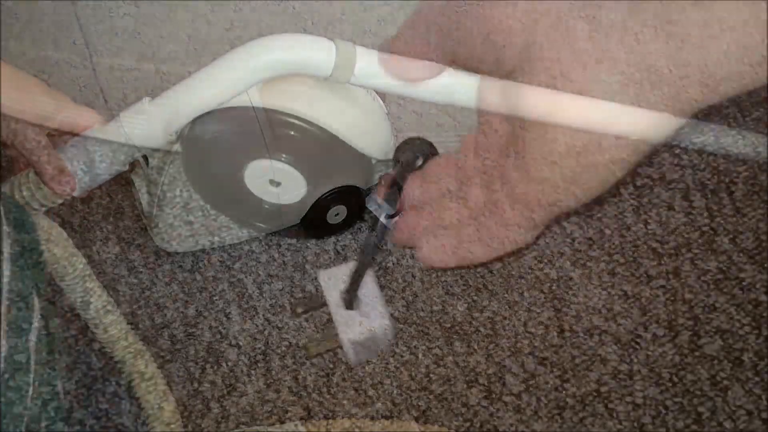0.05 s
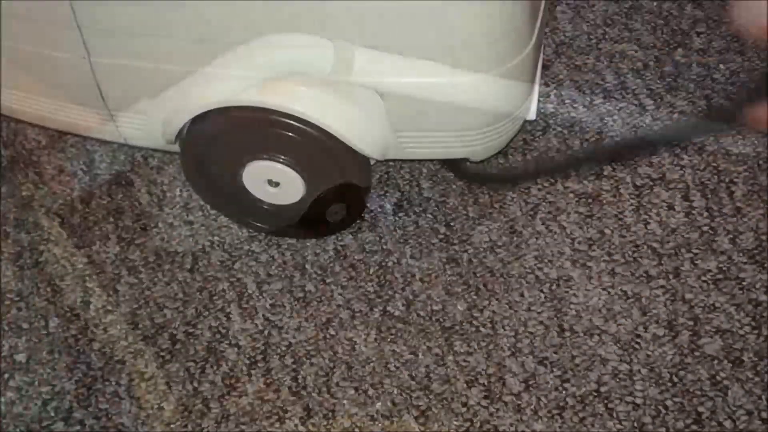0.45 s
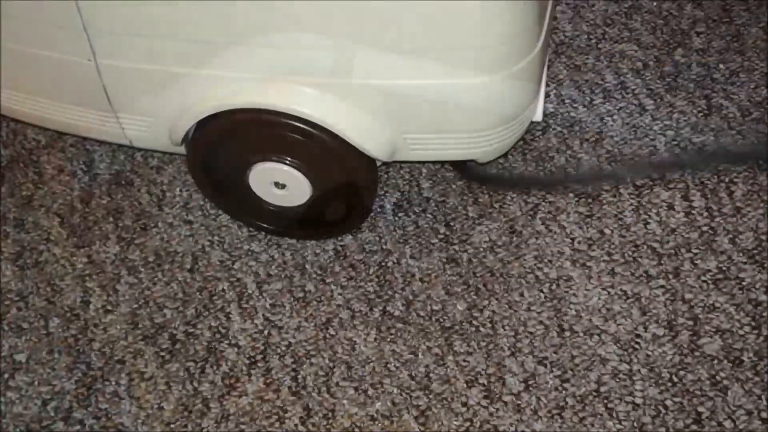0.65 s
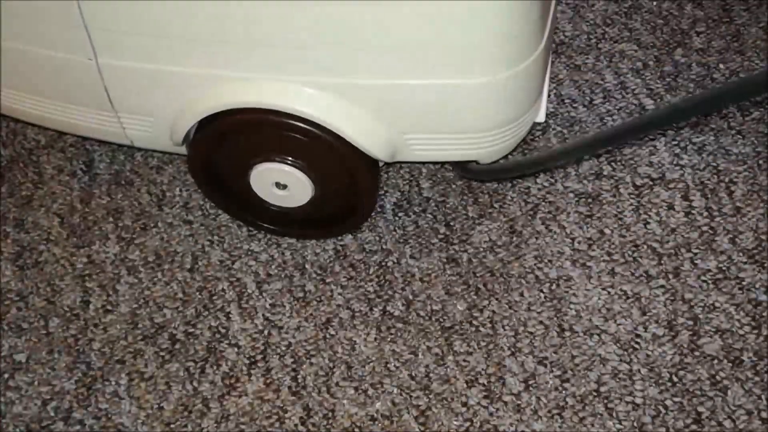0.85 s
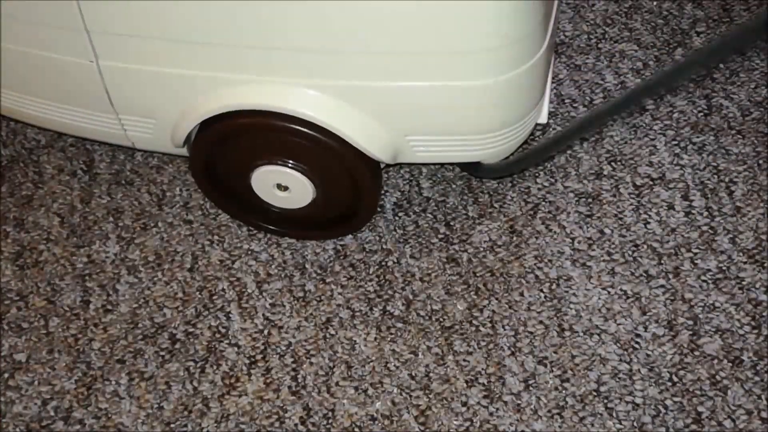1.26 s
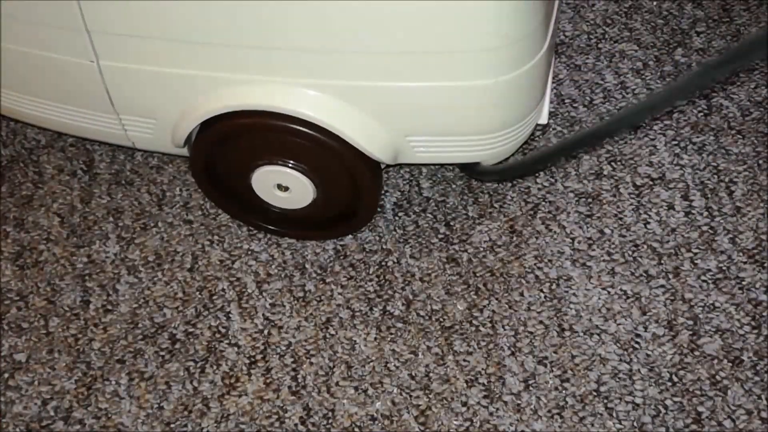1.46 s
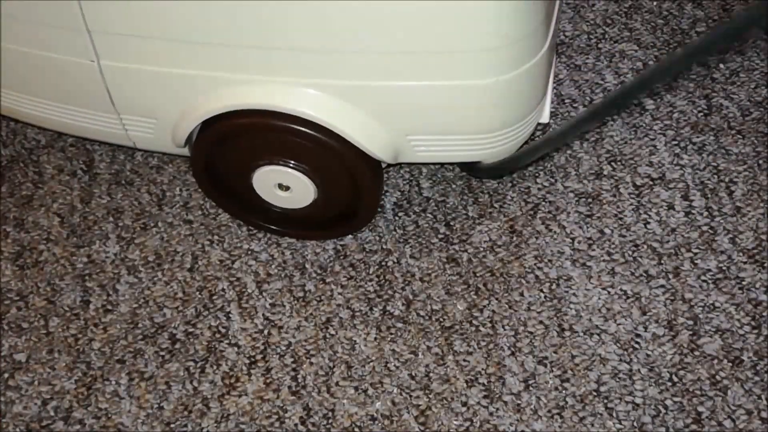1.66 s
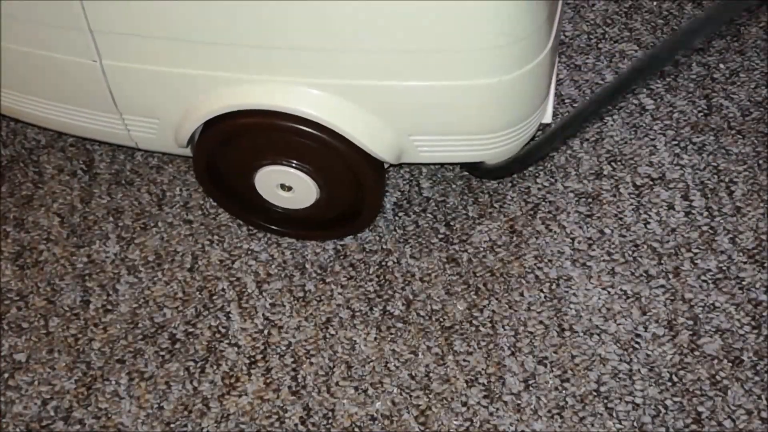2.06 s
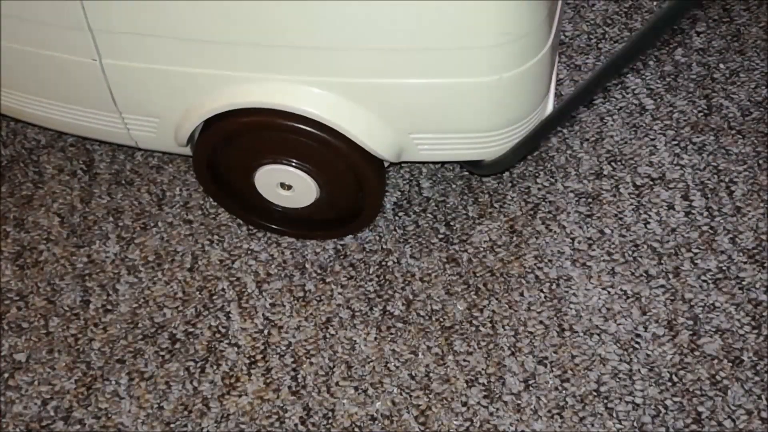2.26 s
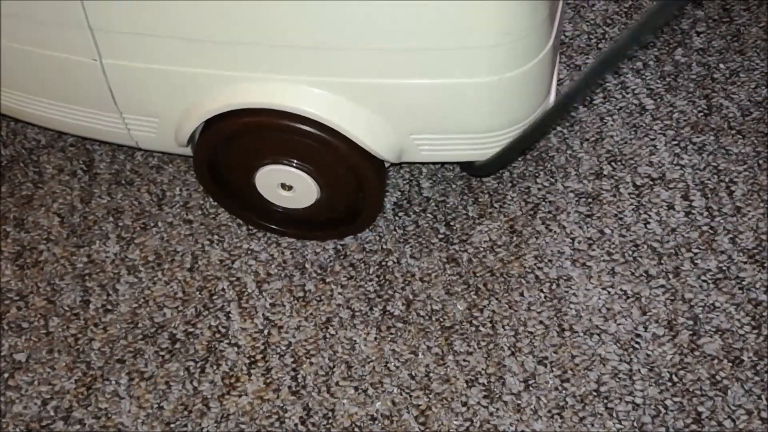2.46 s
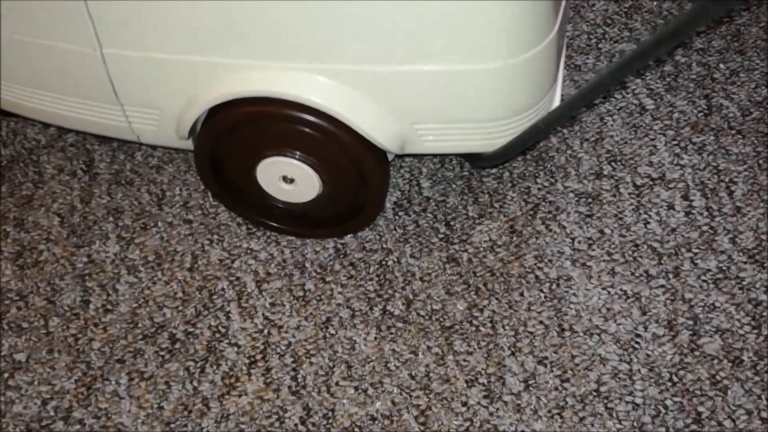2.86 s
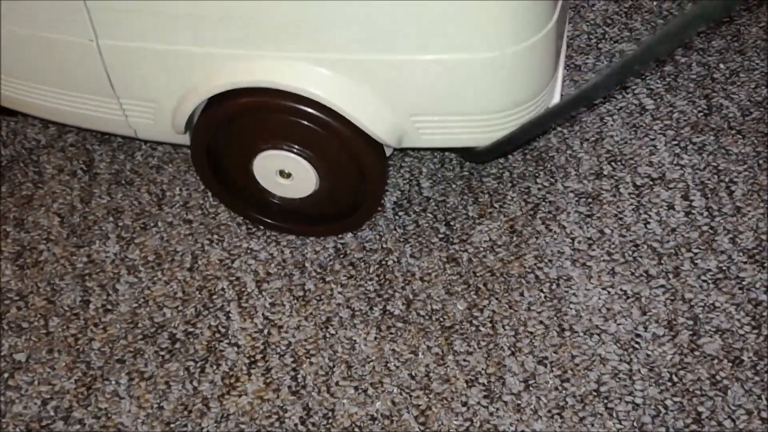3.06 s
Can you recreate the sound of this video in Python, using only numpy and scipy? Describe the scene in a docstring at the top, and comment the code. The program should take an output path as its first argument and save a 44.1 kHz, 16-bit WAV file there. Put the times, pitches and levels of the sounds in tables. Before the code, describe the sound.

A power cord unwinds from a vacuum cleaner with quick, repeated plastic creaks.

```python
"""Pulling out a vacuum cleaner's cord

The power cord is pulled out of a cylinder vacuum cleaner standing on carpet, heard from close by.
Once a turn the cord reel rubs on the plastic housing, sticking and slipping so fast that it croaks.
In between, the cord hisses through its outlet and the reel rumbles in the hollow body.
Plug and cord tick against the plastic."""
import sys
import numpy as np
from scipy import signal
from scipy.fft import rfft, irfft, next_fast_len
from scipy.io import wavfile
from scipy.ndimage import uniform_filter1d

SR = 44100
rng = np.random.default_rng(int(sys.argv[2]) if len(sys.argv) > 2 else 0)


def to_wav(s):
    """Save 16-bit WAV."""
    ch = np.atleast_2d(s).T  # columns
    pcm = np.round(np.clip(ch, -1, 1) * 32767)  # PCM
    wavfile.write(sys.argv[1], SR, pcm.astype(np.int16))


N = 136710
T = np.arange(N) / SR

# Rubs of the reel on the housing, plus a soft tap, a low bump and a short knock.
# Bite is extra force at the start; ring is a note of the spot touched.
# start_s, length_s, level_db, slips_per_s, roughness (0 to 1), brightness_db_per_octave,
# thump_db, scrape_db, bite_db, ring_hz, ring_db
CONTACTS = [(0.101, 0.012, -51, 395.5, 0.31, 0.5, -60, -66, -1, 1120, -4),
            (0.204, 0.052, -50.5, 192, 0.32, -5, -55.5, -63.5, -3, 900, 0),
            (0.396, 0.032, -41, 462.4, 0.26, -2.5, -51, -47.5, 1, 1230, -4),
            (0.57, 0.024, -39.5, 544, 0.29, -1.5, -46, -47.5, 5, 1040, -5),
            (0.678, 0.024, -42.5, 597.4, 0.46, -0.5, -46.5, -73, 9, 1220, -6),
            (0.709, 0.0069, -43.5, 588, 0.1, 0, -59, -72, 9, 1220, -8),
            (0.757, 0.0084, -62, 340, 0.45, -1, -48, -53, 0, 1100, -5),
            (0.821, 0.026, -40, 549.4, 0.39, 3, -50.5, -56.5, -2, 1040, -4),
            (0.961, 0.021, -39, 494, 0.33, -1.5, -49, -53.5, 2.5, 1002, 1.5),
            (1.102, .03, -41.5, 377.4, 0.33, -2, -51, -48.5, 2, 1130, -6),
            (1.274, 0.04, -41, 354, 0.22, -3.5, -57, -54.5, -6, 1090, -12),
            (1.469, 0.025, -40.5, 373, 0.24, -2.5, -50.5, -57.5, -1, 1100, 0),
            (1.599, 0.025, -39.5, 492, 0.33, 0, -48, -51.5, 1.5, 1060, -18),
            (1.718, 0.018, -37, 556.8, 0.06, -4, -54, -51.5, 0, 1670, -4),
            (1.832, 0.023, -41.5, 515, 0.24, -0.5, -48, -53.5, 11, 1050, -6),
            (1.96, 0.031, -43.5, 486, 0.27, 0, -50, -53, 8, 930, 0),
            (2.082, 0.029, -46, 511.7, .3, -1.5, -50, -56.5, 2, 1010, -24),
            (2.222, 0.033, -47, 391.5, 0.17, -5, -52.5, -77, 2, 1185, -4),
            (2.360, 0.026, -42, 548.3, 0.44, -2, -50.5, -55, 4, 1090, -11),
            (2.487, 0.017, -36.5, 539, 0.1, -2, -50.5, -56, -2, 1600, -3),
            (2.603, 0.023, -38.5, 545.6, 0.33, 0, -43.5, -47.5, 3, 1060, -27),
            (2.667, 0.012, -43.5, 610, 0.53, -0.5, -65, -64, 8, 1220, 2),
            (2.725, .031, -39.5, 456, 0.19, -3, -48, -60.5, 6, 880, 0),
            (2.863, 0.027, -42.5, 419, 0.1, -4.5, -53, -59.5, -2, 860, -2),
            (2.889, 0.01, -40.5, 413, 0.16, 1.5, -52, -59, 6, 816, -6)]
# The notes at which the plastic housing rings: pitch_hz, width_hz, level_db, left_over_right_db
HOUSING_NOTES = [(383.5, 47, -6, -9.5), (700, 122, -6.5, -26.5), (896, 52.6, 0.5, 2), (1060, 186, 3, -1.5),
                 (1282, 245, 0.5, -2), (1593, 163, -1, 3), (1966, 256, -4, -5), (2376, 364, -8.5, -20),
                 (3520, 1260, -18.5, -2)]
NOTE_OCTAVES = np.log2([note[0] / HOUSING_NOTES[0][0] for note in HOUSING_NOTES])  # above the lowest
GRAB_S, RELEASE_S = 0.001, 0.0046  # how fast a contact takes hold and lets go


def from_db(db):
    """Turn decibels into a number to multiply a sound by."""
    return 10 ** (np.asarray(db) / 20)


def rms_one(x):
    """Scale a signal so that its average power is 1."""
    return x / np.sqrt(np.mean(x ** 2) + 1e-20)


def gain_curves(rows):
    """Join rows of a time and its decibel levels into one gain curve for each level column."""
    times, *columns = np.transpose(rows)
    return [from_db(np.interp(T, times, column)) for column in columns]


def at_hz(points, hz):
    """Read a value between the rows of a table, with pitch counted in octaves."""
    pitches, values = np.transpose(points)
    return np.interp(np.log(hz), np.log(pitches), values)


def drift(rate_hz):
    """A smooth random wobble, about 1 in size; a higher rate makes it quicker."""
    step, warm_up = 40, 2000
    keep = np.exp(-2 * np.pi * step * rate_hz / SR)
    noise = rng.standard_normal(N // step + warm_up + 2)
    slow = signal.lfilter([1], [1, -2 * keep, keep * keep], noise)[warm_up:]
    return np.interp(np.arange(N) / step, np.arange(len(slow)), rms_one(slow))


def resonate(x, hz, width_hz):
    """Let a signal ring at one pitch; the narrower the width, the longer it rings."""
    keep = np.exp(-np.pi * width_hz / SR)
    feedback = [1, -2 * keep * np.cos(2 * np.pi * hz / SR), keep * keep]
    return signal.lfilter(np.array([1, 0, -1]) * (1 - keep * keep) / 2, feedback, x + 1e-18)


def pan(left_over_right_db):
    """Left and right gains that place a sound to one side."""
    sides = from_db([[left_over_right_db / 2], [-left_over_right_db / 2]])
    return sides / sides.mean()


def envelope(start_s, length_s, rise_s, fall_s):
    """A level that rises, holds, and dies away once length_s is over."""
    age = np.maximum(T - start_s, 0)
    return (1 - np.exp(-age / rise_s)) * np.exp(-np.minimum(np.maximum(age - length_s, 0) / fall_s, 40))


def swells(rows):
    """Add up smooth bumps in level, each with its own rise and fall."""
    return sum(from_db(db) * np.exp(-((T - peak_s) / np.where(T < peak_s, rise_s, fall_s)) ** 2)
               for peak_s, rise_s, fall_s, db in rows)


def stereo_noise(tone, flicker_db):
    """Noise in half-octave bands, each flickering on its own; tone sets their balance."""
    # How alike the two sides sound: pitch_hz, likeness (0 to 1)
    likeness = [(60, 0.81), (150, 0.55), (400, 0), (950, 0.43), (2400, 0.41), (6000, 0.15), (15000, 0)]
    # Which side is louder: pitch_hz, left_over_right_db
    lean = [(60, -9.5), (200, 8.5), (600, -6), (1500, 4), (5000, -0.5), (7500, -2.5), (12000, 3)]
    out, edges = 0, 24 * 2 ** np.arange(0, 9.6, 0.5)
    white = rng.standard_normal((2, 2, N))
    for k, (low, high) in enumerate(zip(edges, edges[1:])):
        band = signal.butter(2, [low, high], "band", fs=SR, output="sos")
        middle, side = signal.sosfilt(band, white[k % 2])
        hz = np.sqrt(low * high)
        alike = at_hz(likeness, hz)
        gain = from_db(at_hz(tone, hz) + flicker_db * drift(24.3)) * pan(at_hz(lean, hz))
        out += gain * (np.sqrt(1 + alike) * middle + np.sqrt(1 - alike) * side * [[1], [-1]])
    return rms_one(out)


def housing(force, boost_db=0):
    """A push makes the plastic shell ring at all its notes, each louder on one side."""
    boosts = from_db(boost_db + np.zeros(len(HOUSING_NOTES)))
    return sum((-1) ** k * boosts[k] * from_db(db) * pan(side_db) * resonate(force, hz, width)
               for k, (hz, width, db, side_db) in enumerate(HOUSING_NOTES))


def hollow_body(db_per_octave):
    """Random shaking makes the hollow body boom at an even level."""
    # The low notes of the hollow body: pitch_hz, width_hz, relative_db
    notes = [(121, 14, -1), (182, 33, -8), (234, 36, -11), (360, 124, -20)]
    boom = 0
    for hz, width, db in notes:
        gain = from_db(db + db_per_octave * np.log2(hz / notes[0][0]))
        boom += gain * resonate(rng.standard_normal(N), hz, width)
    boom = signal.sosfilt(signal.butter(3, [95, 520], "band", fs=SR, output="sos"), boom)
    running_level = np.sqrt(uniform_filter1d(boom ** 2, size=2600) + 1e-12)
    return rms_one(boom / running_level)


def still_room():
    """The quiet background: soft noise and a faint low hum."""
    # The tone of the still room: pitch_hz, relative_db
    air_tone = [(30, -3.5), (120, 10), (300, 4.5), (1200, -3), (4000, -35), (16000, -12.5)]
    hum_hz = 48.9
    hum = from_db(-74.5) * np.sqrt(2) * np.sin(2 * np.pi * hum_hz * T)
    return from_db(-77.5) * stereo_noise(air_tone, flicker_db=1.5) + hum


def reel_rumble():
    """The rolling reel shakes the body; each contact adds a thump that favours its higher notes."""
    # How strongly the reel rumbles: time_s, relative_db
    roll_levels = [(0.0, -62), (0.27, -45.5), (0.28, -51.5), (0.61, -44.5), (0.88, -51.5), (1.12, -40.5),
                   (1.18, -53.5), (1.88, -45.5), (2.21, -65), (2.23, -48.5), (2.87, -49), (3.1, -75)]
    flutter = rms_one(from_db(3 * np.tanh(drift(14))))
    rolling = from_db(-7) * gain_curves(roll_levels)[0] * flutter * hollow_body(db_per_octave=-6.5)
    thumps = sum(from_db(thump_db) * envelope(start_s, length_s, rise_s=0.0038, fall_s=0.019)
                 for start_s, length_s, _, _, _, _, thump_db, *_ in CONTACTS)
    return rolling + thumps * hollow_body(db_per_octave=6)


def cord_hiss(slide_gain):
    """The cord hisses through its outlet, louder at each contact and when the hand tugs."""
    # The tone of the sliding cord: pitch_hz, relative_db
    hiss_tone = [(300, -6), (1000, 4.5), (2200, 0.5), (3500, 1), (5400, -6), (7000, -10), (9000, -11.5),
                 (12500, -25.5), (16000, -23.5)]
    # The pitches that the outlet brings out: pitch_hz, width_hz, gain
    outlet_notes = [(3750, 350, .9), (5300, 600, 1.7), (7050, 200, .7)]
    # Tugs of the hand: peak_s, rise_s, fall_s, level_db
    tugs = [(2.140, 0.016, 0.032, -54.5), (2.588, 0.032, 0.017, -48.5), (2.935, 0.013, 0.027, -57.5)]
    hiss = stereo_noise(hiss_tone, flicker_db=1.5)
    rasp = sum(gain * from_db(2 * drift(18)) * resonate(hiss, hz, width)
               for hz, width, gain in outlet_notes)
    scrapes = sum(from_db(scrape_db) * envelope(start_s, length_s, GRAB_S, fall_s=0.051)
                  for start_s, length_s, *_, scrape_db, _, _, _ in CONTACTS)
    stutter = from_db(0.5 * drift(190))  # the cord's skin is uneven
    return np.hypot(slide_gain, scrapes + swells(tugs)) * stutter * rms_one(hiss + rasp)


def bearing_rustle(turn_gain):
    """The reel's bearing rustles through the housing, with a hollow ring."""
    friction = np.diff(rng.standard_normal(N + 1)) * from_db(2 * drift(56))
    rustle = rms_one(housing(friction))
    ring = from_db(-2) * resonate(rustle, hz=1270, width_hz=220)
    return from_db(-3) * turn_gain * rms_one(rustle + ring)


def handling():
    """Handling makes a faint dull rumble, strongest early in the pull."""
    # How strong that rumble is: time_s, relative_db
    shake_levels = [(0.0, -72), (0.47, -53.5), (0.76, -56), (0.78, -70), (2.66, -115), (2.69, -72),
                    (3.1, -96)]
    shake = resonate(rng.standard_normal(N), hz=50, width_hz=28)
    shake = signal.sosfilt(signal.butter(2, 90, fs=SR, output="sos"), shake)
    return from_db(-8) * gain_curves(shake_levels)[0] * rms_one(shake)


def ticks():
    """Plug and cord hit the plastic: a tiny bright ring, a knock and a brief chatter of parts."""
    # Each hit: start_s, ring_db, ring_hz, ring_s (to fade by 60 dB), knock_db,
    # left_over_right_db, chatter_db
    hits = [(0.077, -42.5, 3180, 0.0023, -34, 12, -47), (0.0805, -45, 5100, .0037, -36.5, -12, -47),
            (0.1410, -57, 6000, 0.013, -69, -10, -70), (0.1830, -49.5, 3690, .025, -54, -13, -60),
            (0.193, -53, 2200, 0.018, -41, -13, -62), (0.3265, -34.5, 4440, 0.0029, -43, -6, -41.5),
            (0.558, -31.5, 5860, 0.00083, -66, -2, -48.5), (0.5720, -36.5, 8500, .001, -37.5, -21.5, -51),
            (0.5797, -10.5, 6630, .001, -27.5, -43, -54), (0.7390, -37, 9400, 0.00073, -63, -23, -66),
            (0.7606, -30.5, 5260, 0.0011, -57, -29, -53), (2.1319, -44, 7600, 0.001, -44, 12, -54)]
    # The tone of the chattering parts: pitch_hz, relative_db
    chatter_tone = [(500, -8), (1500, -7), (6200, 8), (8000, -20), (16000, -14)]
    out, chatter = 0, stereo_noise(chatter_tone, flicker_db=3)
    soften = signal.butter(2, 10000, fs=SR, output="sos")
    for start_s, ring_db, ring_hz, ring_s, knock_db, side_db, chatter_db in hits:
        click = np.zeros(N)
        click[int(start_s * SR)] = 1
        ring = signal.sosfilt(soften, resonate(click, ring_hz, np.log(1000) / (np.pi * ring_s)))
        knock = housing(click, boost_db=4 * NOTE_OCTAVES)  # a hard hit favours the high notes
        burst = envelope(start_s, 0, GRAB_S / 2, fall_s=0.0024)
        out += from_db(ring_db) * pan(side_db) * ring / np.abs(ring).max()
        out += from_db(knock_db) * knock / np.abs(knock).max()
        out += from_db(chatter_db) * pan(side_db) * burst * chatter
    return out


def croaks_and_knocks():
    """A rub is a quick run of slips that rings the housing; very short runs make a tap, bump or knock."""
    gap_spread, size_spread_db, grit_gain = 0.38, 22, 0.6  # at full roughness
    out, bite_s = 0, 0.005
    for row in CONTACTS:
        start_s, length_s, db, slips_per_s, rough, brightness, _, _, bite_db, ring_hz, ring_db = row
        gap_luck, size_luck = rng.standard_normal((2, 64))
        gaps_s = np.exp(gap_spread * rough * gap_luck[1:]) / slips_per_s
        times = start_s + GRAB_S / 2 + np.append(0, np.cumsum(gaps_s))
        sizes = np.tanh(size_luck)
        sizes[:2] = 0.9  # the first two slips are strong
        slips = np.bincount((times * SR).astype(int), from_db(size_spread_db * rough * sizes), N)[:N]
        grit = grit_gain * rough * np.sqrt(slips_per_s / SR) * rng.standard_normal(N)
        bite = from_db(bite_db * np.exp(-np.maximum(T - start_s, 0) / bite_s))
        force = (slips + grit) * bite * envelope(start_s, length_s, GRAB_S, RELEASE_S)
        force += from_db(ring_db) * resonate(force, ring_hz, width_hz=90)
        variation_db = rng.normal(0, 0.7, len(HOUSING_NOTES))
        ringing = housing(force, brightness * NOTE_OCTAVES + variation_db)
        power = np.sum(ringing ** 2) / (2 * length_s * SR)
        out += from_db(db) * ringing / np.sqrt(power)
    return out


def cord_judder():
    """The slack cord drags and judders: a short low groan that swells as it pulls tight."""
    start_s, length_s, level_db, pitch_hz = 0.21, 0.046, -43.5, 190
    phase = 2 * np.pi * np.cumsum(pitch_hz * (1 + 0.06 * drift(54))) / SR
    swell = envelope(start_s, length_s, length_s / 2, RELEASE_S)
    return from_db(level_db) * swell * np.sqrt(2) * np.sin(phase)


def cord_swishes():
    """The cord whips against the outlet: a hard scrape with a bright fizz on top."""
    # Each whip of the cord: peak_s, rise_s, fall_s, scrape_db, fizz_db
    whips = [(0.408, 0.011, 0.031, -52.5, -78), (0.978, 0.01, 0.023, -51.5, -74),
             (1.138, 0.02, 0.02, -44, -61), (2.142, 0.0081, 0.015, -56, -76), (2.620, .011, .016, -49, -72),
             (2.745, .021, 0.031, -52.5, -80), (2.898, 0.033, .046, -52, -70)]
    # The tone of cord scraping on plastic: pitch_hz, relative_db
    scrape_tone = [(300, -23), (1500, 10.5), (3000, 11.5), (5400, 1.5), (7000, -2.5), (9000, -5),
                   (11000, -1), (13000, -18), (16000, -20)]
    # The tone of the fizz: pitch_hz, relative_db
    fizz_tone = [(4000, -28), (8000, 7), (10500, -8), (15500, 1)]
    scrape = swells([whip[:4] for whip in whips]) * stereo_noise(scrape_tone, flicker_db=1.5)
    fizz_gain = swells([(*timing, fizz_db) for *timing, _, fizz_db in whips])
    return scrape + fizz_gain * stereo_noise(fizz_tone, flicker_db=5)


def room_echoes(sound):
    """A carpeted room: ten quickly fading, repeating echoes for each side."""
    fade_s = 0.14  # time to fade by 60 dB
    size = next_fast_len(N + SR // 2)
    one_sample_delay = -2j * np.pi * np.arange(size // 2 + 1) / size
    sides = []
    for delays_s in rng.uniform(0.005, 0.038, (2, 10)):
        bounces = (from_db(-60 * s / fade_s) * np.exp(one_sample_delay * int(s * SR)) for s in delays_s)
        echoes = sum((-1) ** k * bounce / (1 - bounce) for k, bounce in enumerate(bounces))
        echoes /= np.sqrt(np.mean(np.abs(echoes) ** 2))
        sides.append(irfft(rfft(sound, size) * echoes, size)[:N])
    return np.array(sides)


def scene():
    """Mix all the sounds, sending the shell's ringing and the body's rumble into the room."""
    # How loud the moving parts are during the pull: time_s, hiss_db, bearing_relative_db
    pull_levels = [(0.0, -72, -77), (0.14, -66, -63.5), (0.27, -61.5, -52), (0.33, -54, -51.5),
                   (0.54, -50.5, -49.5), (0.95, -51, -53), (1.14, -56, -48.5), (1.31, -54, -58),
                   (1.5, -57, -54.5), (1.73, -50.5, -54), (1.98, -57.5, -52.5), (2.14, -63.5, -58.5),
                   (2.36, -59.5, -57), (2.6, -64, -52.5), (2.74, -62, -48), (2.82, -58, -61.5),
                   (2.96, -71, -57), (3.1, -87, -118)]
    slide_gain, turn_gain = gain_curves(pull_levels)
    cord = cord_hiss(slide_gain) + cord_swishes()
    shell = bearing_rustle(turn_gain) + croaks_and_knocks()
    rumble = reel_rumble() + cord_judder()
    echoes = room_echoes(from_db(-4.5) * shell.mean(axis=0) + from_db(-14) * rumble)
    return still_room() + cord + shell + rumble + echoes + ticks() + handling()


def record(dry):
    """Cut off the very highest treble steeply."""
    cutoff_hz = 15900
    return signal.sosfilt(signal.ellip(10, 0.2, 70, cutoff_hz, fs=SR, output="sos"), dry)


dry = scene()
out = record(dry)
to_wav(out)
```